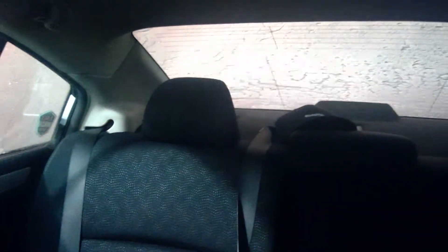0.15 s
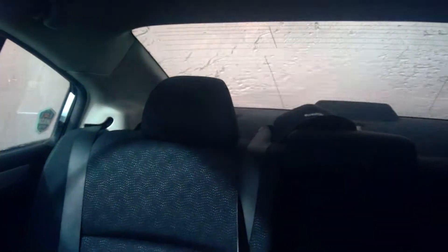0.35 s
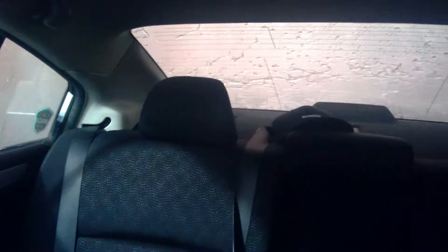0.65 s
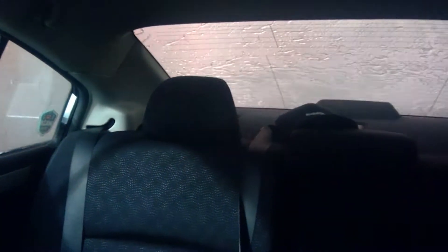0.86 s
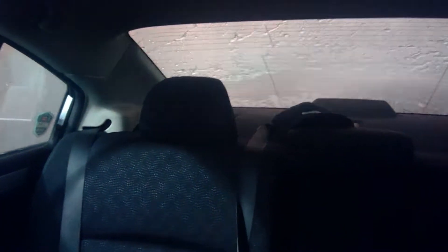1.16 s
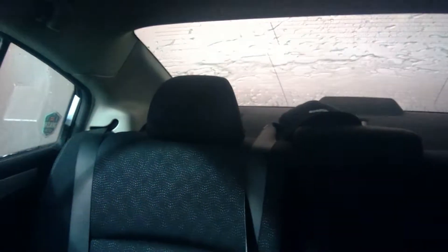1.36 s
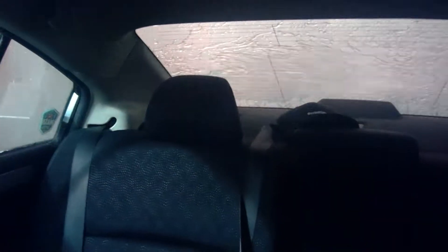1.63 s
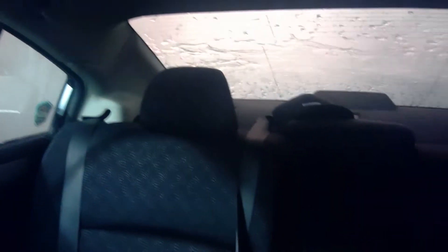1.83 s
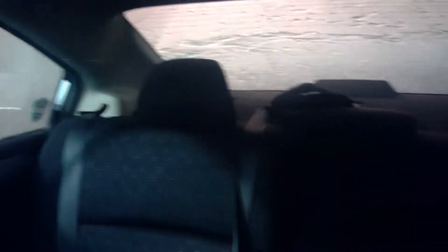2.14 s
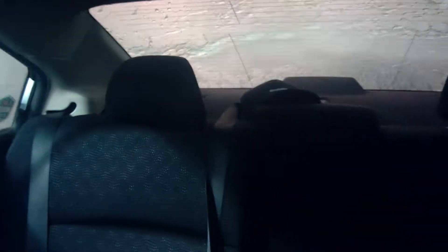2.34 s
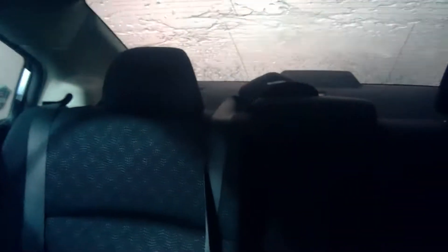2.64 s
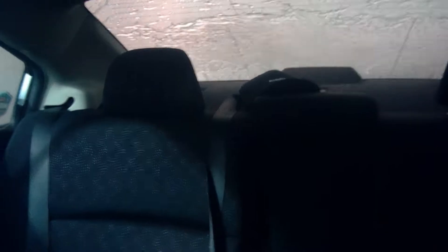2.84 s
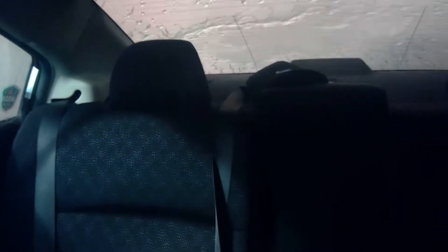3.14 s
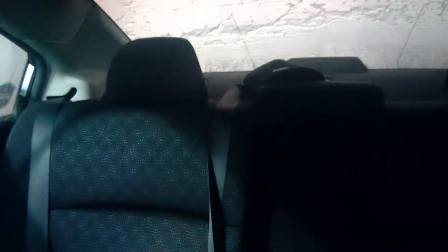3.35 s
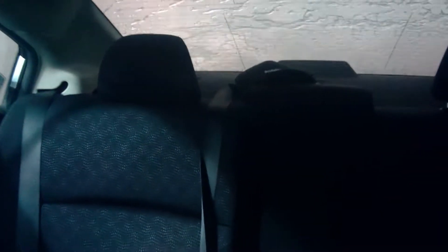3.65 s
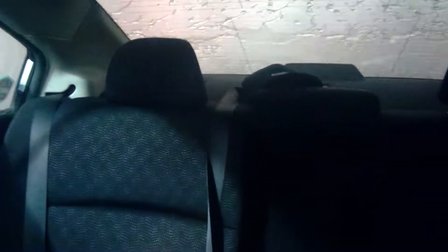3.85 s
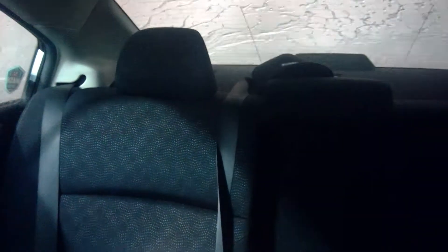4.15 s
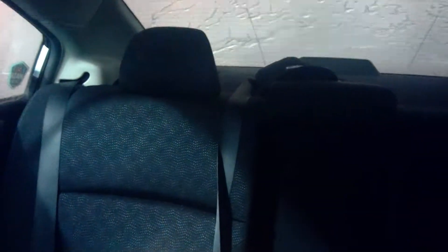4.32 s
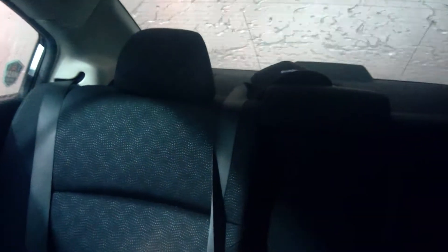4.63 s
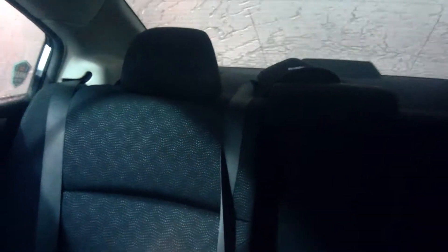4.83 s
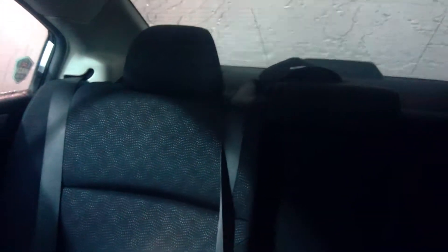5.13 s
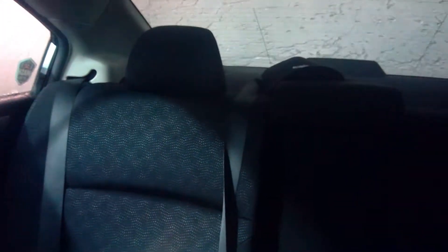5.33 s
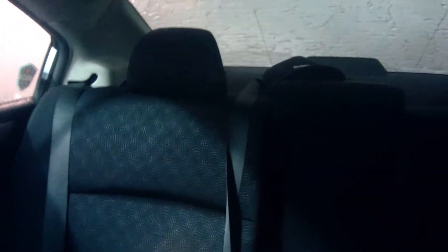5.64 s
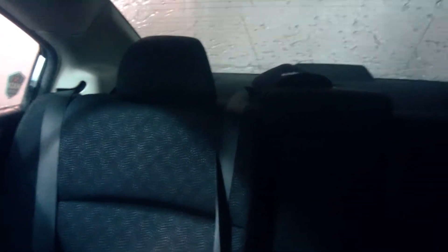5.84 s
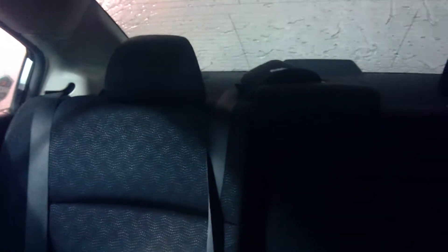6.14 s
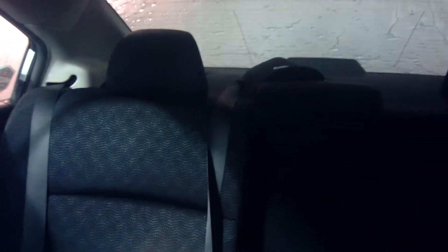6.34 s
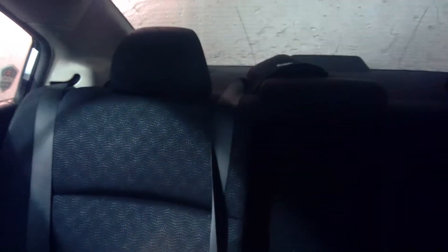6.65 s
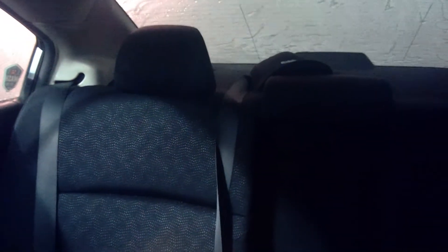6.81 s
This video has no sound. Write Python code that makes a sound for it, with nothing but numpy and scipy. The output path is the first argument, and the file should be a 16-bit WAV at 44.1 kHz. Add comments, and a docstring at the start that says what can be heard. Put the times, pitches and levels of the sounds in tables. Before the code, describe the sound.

A stereo microphone in a car cabin catches loud, rhythmic spray beating on windows and roof, quick pulses of knocking drops with boomy drumming and dull splashes between. The water leans to the right as the left fades, then rapidly dies away around five seconds. After it come distant, light mist patters, a single ringing drip, quiet machine rumble and barely audible hiss, with the left side recovering.

```python
"""Spray jet on a car in an automatic wash

Heard from inside, a jet swings over the body about 2.5 times a second: random drops excite ringing panels.
Each swing patters across the glass, drums on the roof and crosses the glass again; most turns end in a dull splash.
Then the jet leaves and puffs of mist and one drip arrive over low rumble and faint hiss, both shaped noise.
The left side of the water fades for a few seconds and returns."""
import sys
import numpy as np
from scipy import signal
from scipy.fft import rfft, irfft
from scipy.io import wavfile
from scipy.ndimage import uniform_filter1d, map_coordinates

SR = 44100
rng = np.random.default_rng(int(sys.argv[2]) if len(sys.argv) > 2 else 0)


def file_out(sig):
    """Save sig as 16-bit WAV at sys.argv[1]."""
    # one column per channel
    cols = np.atleast_2d(sig).T
    # limit, then scale
    lim = np.clip(cols, -1, 1)
    pcm = np.round(lim * 32767).astype(np.int16)
    wavfile.write(sys.argv[1], SR, pcm)


N = 307818
TIME = np.arange(N) / SR

# Levels are relative: each source then applies its own gain.
# first turn of the jet, and time from one turn to the next
TURN_S, SWING_S = 0.1686, 0.3948
# the roof drums hardest this long after each turn, and this much less half a swing away
ROOF_PEAK_S, ROOF_DIP_DB = 0.23, -8.5
# half duration of a splash, before its rise and fall factors
SPLASH_HALF_S = 0.023
# lead of the left side for every struck spot
LEFT_LEAD_S = 0.00009
# upper edge of the band
EDGE_HZ = 15770

# force of the jet on the panes, nearly steady until it leaves the car: (time [s], level [dB])
JET_FORCE = [(0, -1), (1.4, 0.5), (2.9, -0.5), (4.3, -2.5), (4.64, -4.5), (4.85, -12), (5.05, -42)]
# crossings of the glass, out and back: (time after the turn [s], patter level [dB], spatter level [dB])
GLASS_CROSSINGS = [(0.139, -31.5, -44), (0.319, -32, -49)]
# time the fan of drops takes to cross, briefer once only its tip reaches the car,
# before rise and fall factors: (time [s], half duration [s])
FAN_DURATION = [(0, 0.021), (3.3, 0.034), (4.45, 0.025), (4.64, 0.011)]
# load of heavy water on the roof: (time [s], level [dB])
ROOF_LOAD = [(0, -43.5), (0.55, -39), (0.78, -30.5), (1.2, -32), (2.0, -37.5), (2.75, -33.5), (3.6, -41.5),
             (4.33, -37.5), (4.75, -44), (5.15, -55.5), (7.0, -76.5)]
# loose water landing on the body, mostly just after a turn: (time [s], level [dB])
SPLASH_TIMES = [(0.595, -42.5), (0.988, -34.5), (1.392, -34), (1.781, -34), (2.185, -35.5), (2.578, -34.5),
                (2.97, -32), (3.368, -41), (3.767, -41), (4.7, -50), (5.03, -52)]
# fine mist on the windows: (time [s], level [dB])
MIST_LEVEL = [(0, -53), (0.8, -49.5), (4.3, -54), (4.71, -57.5), (5.5, -83.5), (7.0, -91)]
# mist from the far jet, before rise and fall factors: (time [s], half duration [s], level [dB])
MIST_PUFFS = [(5.002, 0.048, -63), (5.165, 0.046, -57.5), (5.424, 0.04, -69), (5.565, 0.07, -68),
              (5.816, 0.022, -80), (5.964, 0.024, -67.5), (6.205, 0.016, -83), (6.345, 0.02, -79.5),
              (6.594, 0.013, -76), (6.761, 0.021, -73)]
# a single drip, level before its soft onset: (time [s], frequency [Hz], level [dB], 60 dB decay time [s])
PANE_DRIP = (5.245, 1160, -60, .16)
# gain of the left side of the water: (time [s], body level [dB], treble level [dB])
LEFT_FADE = [(0, 1, -0.5), (1.2, -1, -4), (1.4, -3, -16.5), (2.1, -7, -18.5), (2.5, -19, -22.5),
             (4.4, -18.5, -21.5), (5.15, -7.5, -12), (5.35, -4.5, -7), (6.1, -3, -2)]

# spectra of large drops on glass, of small bright drops on glass and of the drummed roof:
# (frequency [Hz], spectral level [dB])
PATTER_SPECTRUM = [(30, -12.5), (150, -9), (300, -0.5), (480, -1), (650, -1), (830, -2), (980, -5),
                   (1250, -9.5), (1450, -15), (2200, -16.5), (3000, -27), (5000, -34), (15000, -57)]
SPATTER_SPECTRUM = [(300, -8), (1200, -7), (2000, -4.5), (3000, -1), (3700, 5), (4500, -2), (5500, -2.5),
                    (7000, -3), (9000, -9), (12000, -15.5), (15500, -14.5)]
ROOF_SPECTRUM = [(20, -20), (45, 2.5), (63, -4.5), (90, -2), (125, 2.5), (210, -1.5), (280, -2), (420, -5),
                 (600, -12), (1000, -16.5), (1600, -44), (5000, -88)]
# spectra of dull splashes, near mist and distant puffs: (frequency [Hz], spectral level [dB])
SPLASH_SPECTRUM = [(30, -26), (200, -4.5), (450, -4), (750, -4.5), (950, -9), (1250, -20.5), (1500, -27.5),
                   (2400, -39), (4500, -39.5), (15000, -48.5)]
MIST_SPECTRUM = [(300, -24), (1500, -6), (2900, -5), (3700, -1.5), (4700, 3.5), (5600, -1), (7000, -5),
                 (9000, -8.5), (12000, -10.5), (15500, -14)]
PUFF_SPECTRUM = [(300, -22), (1500, -12), (1900, -10), (2900, -13), (3600, -4), (4100, 0.5), (4500, 2),
                 (4900, -0.5), (5400, 0.5), (6400, -8.5), (9000, -13.5), (15500, -21)]
# resonances of the panes and the cabin: (frequency [Hz], width [Hz], lift [dB])
PANEL_MODES = [(81.2, 18, 7), (120.3, 10, 5), (204.3, 21, 6.5), (321, 15, 6.5), (407.5, 45, 4),
               (494, 13, 8), (593, 45, 4), (744.3, 49, 7), (1142, 46, 7.5), (1192, 39, 7.5),
               (1524, 19, 7.5), (1826, 56, 4), (2070, 87, 2), (2370, 20.2, 5), (2620, 30, 5.5),
               (3370, 76, 4.5), (3795, 69, 3), (4370, 74, 4)]
# spectra of cabin boom, steady rumble and hiss: (frequency [Hz], spectral level [dB])
BOOM_SPECTRUM = [(8, -17), (20, -3), (27, 10.5), (35, -6.5), (44, 4), (55, -14.5), (80, -30), (300, -65)]
RUMBLE_SPECTRUM = [(8, -15.5), (20, 2), (27, 14.5), (34, -11.5), (45, -13), (65, -9.5), (120, -14.5),
                   (210, -14.5), (260, -18.5), (450, -20), (650, -29.5), (950, -35), (1180, -37),
                   (1400, -47), (4000, -81)]
HISS_SPECTRUM = [(100, 2), (1500, 3.7), (4500, 0.83), (8000, -3.4), (15500, -2)]
# likeness of the two sides: (frequency [Hz], coherence [0 to 1])
COHERENCE = [(60, 1), (400, 1), (750, 0.93), (950, 0.89), (1200, 0.94), (2000, 0.46), (3000, 0.326),
             (4000, 0.48), (7000, 0.088), (15000, .05)]
# extra colour of struck spots on the left, mostly brighter: (frequency [Hz], level [dB])
LEFT_SPECTRUM = [(100, -1), (750, 0.5), (950, -2.5), (1200, 4), (3000, 3), (3800, 6), (5500, 4),
                 (7000, 3.5), (9000, 6.5), (12000, 9.5), (15000, 12.5)]


def patter():
    """Impact excitation: large drops knock on the panes and set them ringing."""
    strength = surges(passes(), axis=2, rise=1, fall=1.124, lead_s=0.0026)
    return amp(1.19) * shower(strength, PATTER_SPECTRUM, per_s=3800, spread_db=2, t60=0.082, ring=1.61, count=12)


def spatter():
    """Break-up of the jet: small drops strike the glass and excite its upper range."""
    strength = surges(passes(), axis=3, rise=1.16, fall=0.72, lead_s=0.00204)
    strength = strength * clumps(depth_db=1.5)
    return amp(2.44) * shower(strength, SPATTER_SPECTRUM, per_s=5500, spread_db=3.0, t60=0.062, ring=2.1, count=4)


def passes():
    """Periodic scanning: crossings as (time [s], half duration [s], patter level [dB], spatter level [dB])."""
    rows = []
    for turn in np.arange(TURN_S - SWING_S, JET_FORCE[-1][0], SWING_S):
        for delay, patter_db, spatter_db in GLASS_CROSSINGS:
            s = turn + delay
            half_s = np.interp(s, *np.transpose(FAN_DURATION))
            force_db = np.interp(s, *np.transpose(JET_FORCE))
            rows.append((s, half_s, patter_db + force_db, spatter_db + force_db))
    return rows


def roof():
    """Damped panel vibration: between the panes the jet drums on the lined sheet metal."""
    return amp(-0.82) * shower(roof_load(), ROOF_SPECTRUM, per_s=600, spread_db=1.5, t60=0.053, ring=0.85, count=12)


def roof_load():
    """Periodic loading: the water holds on the roof through each swing and ebbs as the jet turns."""
    away = np.sin(np.pi * (TIME - TURN_S - ROOF_PEAK_S) / SWING_S) ** 2
    return amp(curve(ROOF_LOAD) + ROOF_DIP_DB * away ** 2.08)


def splashes():
    """Slow impact: loose water lands with a dull slap, weak in treble."""
    rows = [(s, SPLASH_HALF_S, db) for s, db in SPLASH_TIMES]
    strength = surges(rows, axis=2, rise=0.66, fall=1.5, lead_s=0.01)
    return amp(0.5) * shower(strength, SPLASH_SPECTRUM, per_s=3000, spread_db=5.5, t60=0.078, ring=1.26, count=6)


def mist():
    """Dense random impacts: fine drops hiss on the windows and nearly all miss the car at each turn."""
    reach = abs(np.sin(np.pi * (TIME - TURN_S + 0.0033) / SWING_S))
    share = reach ** 5 / (reach ** 5 + 0.48 ** 5) + amp(-27) ** 2  # power, with a small remainder at the turns
    strength = amp(curve(MIST_LEVEL)) * np.sqrt(share) * clumps(depth_db=2.5)
    return amp(2.0) * shower(strength, MIST_SPECTRUM, per_s=4500, spread_db=1.5, t60=0.08, ring=1.1, count=3)


def puffs():
    """Sparse impacts: scattered drops from afar make the glass tinkle with a longer ring."""
    strength = surges(MIST_PUFFS, axis=2, rise=1.1, fall=0.59, lead_s=0.0052)
    return amp(0.5) * shower(strength, PUFF_SPECTRUM, per_s=830, spread_db=5.5, t60=0.13, ring=3.3, count=2)


def drip():
    """Free vibration: one drop rings a pane as a decaying sine with a soft onset."""
    s, hz, db, t60 = PANE_DRIP
    age = np.maximum(TIME - s, 0)
    onset = 1 - np.exp(-age / 0.0015)
    return amp(db - 60 * age / t60) * onset * np.sin(2 * np.pi * hz * age)


def boom():
    """Cavity response: the whole cabin booms, following the roof's load averaged over half a second."""
    load = np.sqrt(uniform_filter1d(roof_load() ** 2, size=SR // 2))
    return load * background(BOOM_SPECTRUM, db=-2.5)


def rumble():
    """Modulated noise: the low rumble of the machine swells unevenly."""
    return background(RUMBLE_SPECTRUM, db=-57.0) * amp(1.3 * wander(N, order=2600))


def hiss():
    """Stationary noise: a faint, steady, broad hiss."""
    return background(HISS_SPECTRUM, db=-83.0)


def background(colour, db):
    """Spectral shaping: steady stereo noise takes a given colour."""
    hz = np.fft.rfftfreq(N, 1 / SR)
    spectra = pair(rfft(rng.standard_normal((2, N))), hz) * amp(read(colour, hz))
    return amp(db) * unit(irfft(spectra, N))


def shower(strength, colour, per_s, spread_db, t60, ring, count=12):
    """Superposition of impacts: random drops of uneven size strike spots near the jet's moving aim."""
    at = np.flatnonzero(rng.random(N) < per_s / SR)
    size_db = spread_db * np.minimum(rng.exponential(1, len(at)), 3.5)
    drops, place = np.zeros(N), np.zeros(N, int)
    drops[at] = rng.choice([-1, 1], len(at)) * amp(size_db)
    # swing plus slow travel, in car widths
    aim = .3 * np.cos(2 * np.pi * (TIME[at] - TURN_S) / SWING_S) + .25 * TIME[at]
    place[at] = np.floor(count * (aim + .07 * rng.standard_normal(len(at)))) % count
    drops = unit(drops) * strength
    water = 0
    for k in range(count):
        struck = (drops * (place == k))[None]
        water = water + signal.oaconvolve(struck, spot(colour, t60, ring), axes=1)[:, :N]
    return water


def spot(colour, t60, ring, patchy_db=3.5, size=8192):
    """Impulse response: a struck spot gives a sharp tap, then a short ring of panel and cabin."""
    t, hz = np.arange(size) / SR, np.fft.rfftfreq(size, 1 / SR)
    tail = rng.standard_normal((2, size)) * amp(-60 * t / t60)
    tail *= ring / np.linalg.norm(tail, axis=1, keepdims=True)
    # the tap, within the first millisecond on each side
    tail[[0, 1], rng.integers(0, SR // 1000, 2)] += rng.choice([-1, 1], 2)
    db = read(colour, hz)
    for f, width, lift in PANEL_MODES:
        db = db + lift / (1 + (2 * (hz - f) / width) ** 2)
    db += patchy_db * wander(len(hz), order=24) * hz / (hz + 900)  # each spot favours its own upper modes
    # minimum phase: resonances ring after the tap
    cepstrum = irfft(np.log(amp(db)))
    causal = np.exp(rfft(2 * cepstrum[:size // 2], size) - cepstrum[0])
    spectra = pair(rfft(tail), hz) * causal
    spectra[0] *= amp(read(LEFT_SPECTRUM, hz))
    spectra[1] *= np.exp(-2j * np.pi * hz * LEFT_LEAD_S)  # delays the right side
    response = irfft(spectra)
    return response / np.linalg.norm(response[1])


def surges(rows, axis, rise, fall, lead_s):
    """Power summation: each burst of water holds, then drops at its edges; rise and fall stretch its sides."""
    power = np.zeros(N)
    for row in rows:
        offset = (TIME - row[0] + lead_s) / row[1]
        offset /= np.where(offset < 0, rise, fall)
        burst = amp(row[axis]) / (1 + offset ** 4)
        power += burst ** 2
    return np.sqrt(power)


def clumps(depth_db):
    """Random modulation: the spray breaks up unevenly, in gusts of a few hundredths of a second."""
    return unit(amp(depth_db * wander(N, order=1100)))


def wander(size, order):
    """Smooth random process: rms of one, with a new value every `order` steps."""
    knots = rng.standard_normal(size // order + 2)
    return unit(map_coordinates(knots, [np.arange(size) / order], mode="nearest"))


def pair(z, hz):
    """Interaural coherence: mixes two unrelated spectra until they are as alike as the two sides."""
    same = np.clip(read(COHERENCE, hz), -1, 1)
    left = same * z[1] + np.sqrt(1 - same ** 2) * z[0]
    return np.array([left, z[1]])


def fade_left(x, split_hz):
    """Band-split gain: the left side sinks and comes back, its treble dropping ahead of its body."""
    body = signal.sosfiltfilt(signal.butter(2, split_hz, fs=SR, output="sos"), x[0])
    treble = x[0] - body
    left = body * amp(curve(LEFT_FADE, axis=1)) + treble * amp(curve(LEFT_FADE, axis=2))
    return np.array([left, x[1]])


def amp(db):
    """Logarithmic level: decibels to amplitude gain."""
    return 10 ** (np.asarray(db) / 20)


def unit(x):
    """Power normalisation: scales to an rms of one."""
    return x / np.sqrt(np.mean(x ** 2) + 1e-20)


def curve(rows, axis=1):
    """Linear interpolation: one column of a table, joined by straight lines in time."""
    rows = np.array(rows)
    return np.interp(TIME, rows[:, 0], rows[:, axis])


def read(points, hz):
    """Logarithmic frequency scale: interpolates a spectrum along it."""
    f, value = np.transpose(points)
    return np.interp(np.log(hz + 1), np.log(f + 1), value)


def scene():
    """Linear superposition: water on the car, its left side fading, over rumble and hiss."""
    water = patter() + spatter() + roof() + splashes() + mist() + puffs() + drip() + boom()
    return fade_left(water, split_hz=780) + rumble() + hiss()


def record(dry):
    """Band limitation: a steep linear-phase low-pass."""
    lowpass = signal.firwin(511, EDGE_HZ, window=("kaiser", 9), fs=SR)
    return signal.oaconvolve(dry, lowpass[None], "same")


dry = scene()
out = record(dry)
file_out(out)
```